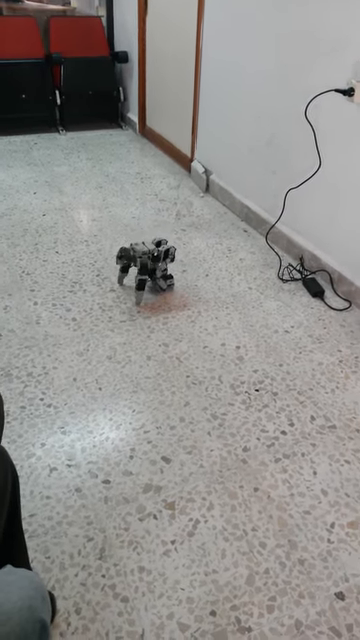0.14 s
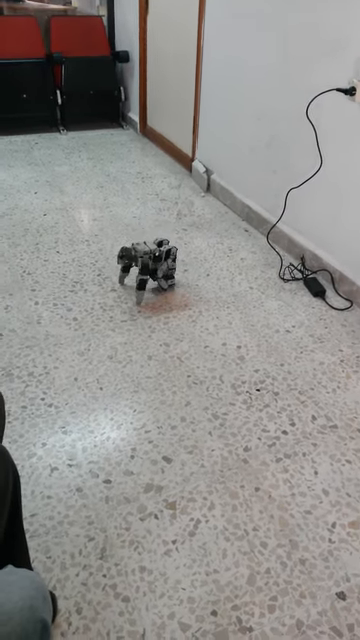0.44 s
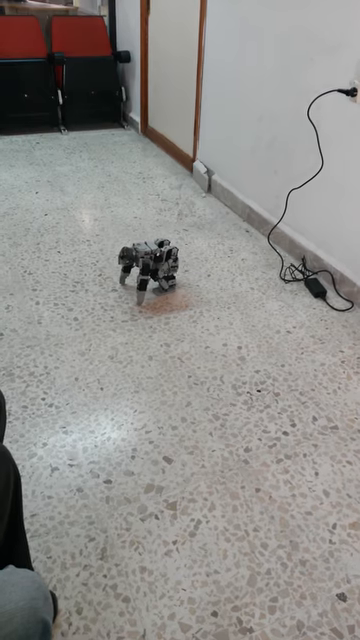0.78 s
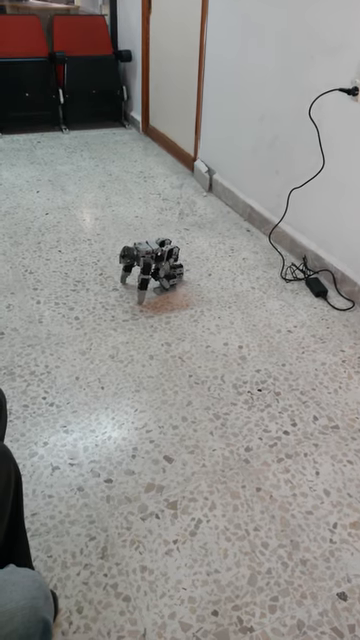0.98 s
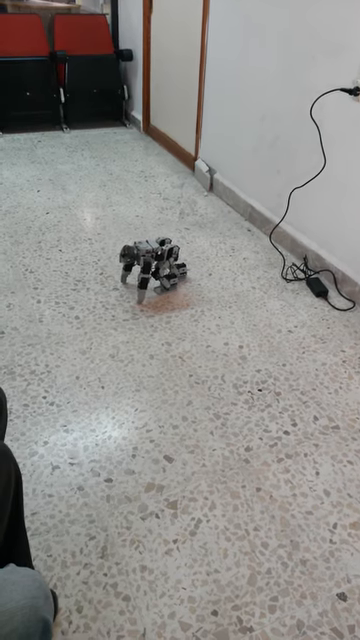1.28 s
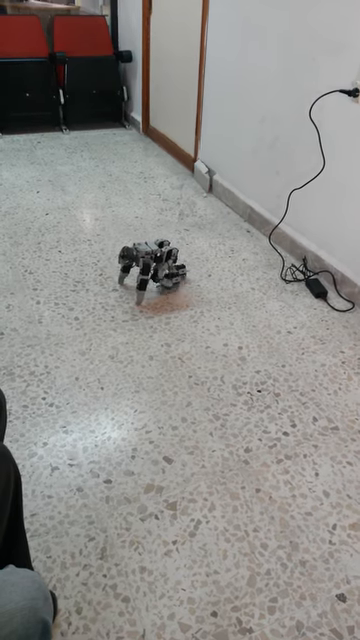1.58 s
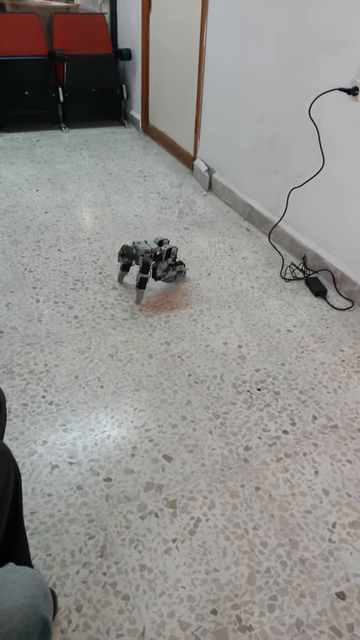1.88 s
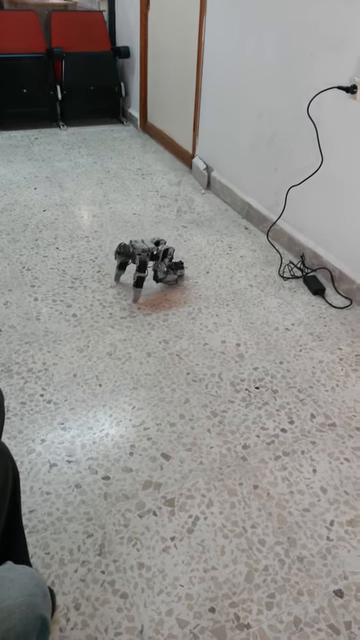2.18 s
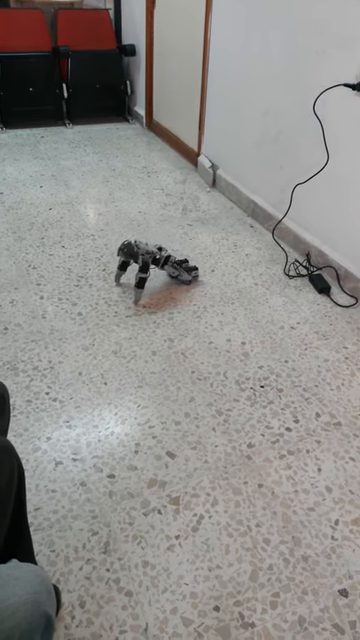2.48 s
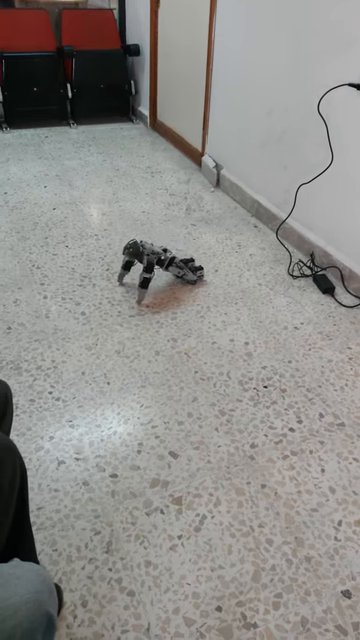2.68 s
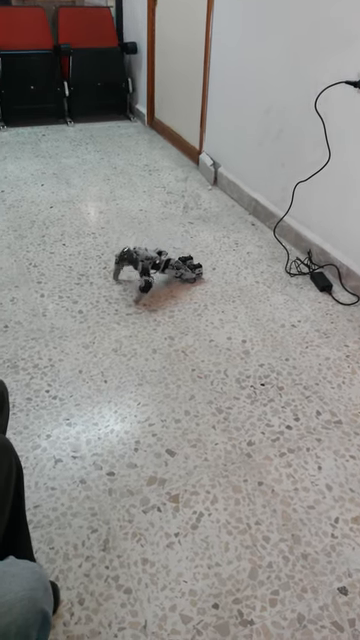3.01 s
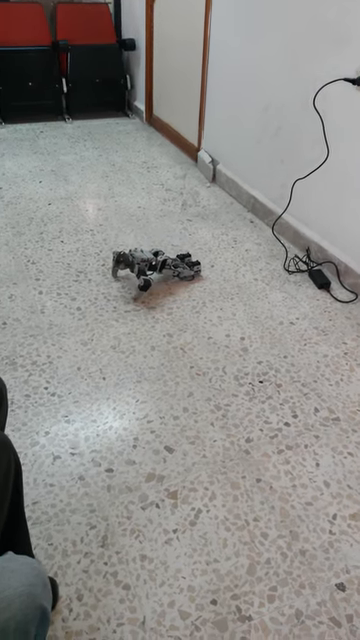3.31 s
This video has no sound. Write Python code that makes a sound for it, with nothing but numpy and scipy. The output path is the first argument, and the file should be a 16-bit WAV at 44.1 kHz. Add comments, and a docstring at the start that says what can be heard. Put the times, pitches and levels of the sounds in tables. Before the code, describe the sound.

Small robot servos whir in a bare, echoing room over soft air noise. A quiet, gritty whine rises and falls at 0.2-0.8 s; a stronger one at 0.85-1.45 has a light tick near 1.1 and faint foot scrape around 1.3. A third, softer, runs 1.5-2.05. The fourth, loudest and highest, runs 2.1-2.75 with clustered hard knocks near 2.4. A final whir spans 2.8-3.4.

```python
"""A small robot lowers itself onto a stone floor in five moves, its servos speeding up and slowing down.
Their gears whine at multiples of the rate at which teeth meet, and rattle as noise pulsed by each tooth.
Limbs knock on the floor, hardest in the fourth move: short noise bursts, ringing tones and a low boom.
A foot scrapes, as shaped noise, as the second move ends. A bare room echoes the robot's sounds.
Soft air noise and faint wavering tones lie underneath."""
import sys
import numpy as np
from scipy import signal
from scipy.fft import rfft, irfft, next_fast_len
from scipy.io import wavfile
from scipy.ndimage import uniform_filter1d

SR = 44100
rng = np.random.default_rng(int(sys.argv[2]) if len(sys.argv) > 2 else 0)


def generate_wav(sig):
    """Save sig (samples, or channels by samples) to the path in sys.argv[1] as 16-bit PCM at SR."""
    pcm = np.round(np.clip(np.atleast_2d(sig).T, -1, 1) * 32767).astype(np.int16)
    wavfile.write(sys.argv[1], SR, pcm)


N = 152145  # length in samples

# Faint tones that come and go. Each row: pitch in Hz, level in dB, loudest moment in seconds,
# time in seconds from there to 1/e of the peak.
HUM = [(124, -58, 4.3, 3.05), (201, -62, 5.1, 5.6), (358, -60, 0.29, 0.28), (334.3, -59, 2.21, 0.96),
       (646, -51, 1.246, 0.2), (634, -59, 2.2, 1.03), (141, -48, 3.116, 0.17)]
# Colour of the air noise. Each row: frequency in Hz, relative level in dB per Hz.
AIR_SPECTRUM = [(30, 5), (70, 18.5), (130, 11), (250, 16), (420, 11), (650, 9), (1000, 5), (1600, 2.5),
                (4000, -7), (7000, -68), (14000, 0)]
# Colour of the foot scraping on stone. Each row: frequency in Hz, relative level in dB per Hz.
SLIDE_SPECTRUM = [(200, -24), (450, -1), (720, 3), (1000, -2), (1400, 4.5), (2200, -4), (4000, -38),
                  (9000, -42)]
# Limbs meeting the floor. Each row: start in seconds, then relative levels in dB of the clack,
# the thud and the boom of the frame.
KNOCKS = [(1.105, -29, -60, -40.5), (1.505, -43, -57, -75), (2.355, -17, -38, -45),
          (2.369, -14.5, -41.5, -37.5), (2.379, -19.5, -54, -66), (2.402, -20, -43.5, -48),
          (2.427, -28, -68, -52), (3.057, -46, -81, -41)]
# Ringing tones of the frame. Each row: pitch in Hz, relative level in dB, time to fall by 60 dB in seconds.
FRAME_TONES = [(1998, -13, 0.14), (3136, 2.5, 0.13), (3184, 3.5, .12), (3330, -15, .05), (3340, 2.5, 0.16),
               (3410, -0.5, 0.13), (3640, -15, 0.075), (4300, -27, .06), (4650, -11, 0.2)]
# Colour of a knock's sharp part. Each row: frequency in Hz, relative level in dB per Hz.
CLACK_SPECTRUM = [(300, -50), (1200, -20.5), (2000, -3), (3200, -2.5), (5000, 0.5), (7400, 8),
                  (10000, -9.5), (14600, -19)]
# Colour of a knock's dull part. Each row: frequency in Hz, relative level in dB per Hz.
THUD_SPECTRUM = [(50, -46), (100, -26), (145, -15), (210, 7), (320, -5), (420, 3), (650, -7.5), (900, -17),
                 (2000, -35)]
# Servo runs. Each row: a list of harmonic levels in dB from the first up, then the course of the run,
# whose rows are: time in seconds, teeth meeting per second in Hz, whine against rattle in dB.
SERVO_RUNS = [([-12, -5, 4, 2.5, -12, -4, -16, -7.5], [(.2, 201.5, -40), (.33, 902, -14), (.385, 1092, -7),
              (.41, 1190, -4), (.45, 1260, 1), (.51, 1220, -4.5), (.557, 1227, -3), (.6, 1057, -21),
              (.8, 196, -40)]), ([3, 2, -6.5, 1.5, -3, -4], [(.82, 200.8, -40), (.98, 1201, -18),
              (1.005, 1275, -4), (1.07, 1404, -0.5), (1.12, 1433, -1), (1.145, 1419, -10), (1.18, 1334, 0),
              (1.22, 1228, -5), (1.26, 1049, -20), (1.46, 196.6, -35)]), ([-16, -8, 3, -16, 0, -8],
              [(.82, 200.4, -47), (1.0, 1316, -5), (1.05, 1500, -3.5), (1.125, 1527, -0.5),
              (1.155, 1552, -6), (1.185, 1614, -7), (1.4, 194.4, -32)]),
              ([2.5, -6.5, 4.5, 2, -0.5, -3.5, -7], [(1.48, 199.8, -37), (1.64, 1218, -10),
              (1.665, 1313, -2), (1.7, 1412, -1.5), (1.745, 1440, -2), (1.785, 1396, 3), (1.83, 1280, -1),
              (1.86, 1179, -3), (1.89, 1058, -18), (2.07, 200, -35)]), ([-10, 3, -0.5, -21],
              [(2.1, 400.7, -38), (2.24, 1955, -21), (2.27, 2160, -2.5), (2.305, 2340, -2.5),
              (2.35, 2470, 0), (2.42, 2718, -4), (2.5, 2706, -5), (2.528, 2540, -2), (2.55, 2109, 4),
              (2.562, 2030, -17), (2.585, 2078, 0), (2.61, 1938, -7), (2.77, 400.3, -40)]),
              ([-3.5, 0, 7.5, -4, -1.5, -2], [(2.78, 298.9, -37), (2.91, 1563, -14), (2.96, 1935, -6),
              (3.01, 2072, 0), (3.06, 2082, -1.5), (3.11, 2063, 0.5), (3.15, 1908, -8), (3.42, 292, -57)]),
              ([-1, -5, -9, -2, 4.5, -4], [(2.78, 200.1, -38), (2.95, 1400, -14), (3.03, 1479, -9),
              (3.11, 1447, -3.5), (3.2, 1194, -7), (3.42, 201.5, -40)])]
# Effort of all gear trains together. Each row: time in seconds, level in dB.
EFFORT = [(0.0, -46.5), (0.2, -60), (0.32, -42.5), (0.45, -37), (0.61, -35.5), (0.81, -64.5), (0.87, -43.5),
          (0.95, -29.5), (1.05, -27.5), (1.15, -27.5), (1.29, -28), (1.48, -55), (1.53, -41.5), (1.68, -33),
          (1.78, -33.5), (1.95, -35), (2.08, -63), (2.2, -30), (2.32, -24), (2.36, -23), (2.378, -20),
          (2.52, -24.5), (2.55, -21.5), (2.68, -39), (2.78, -46), (2.88, -32), (2.96, -25.5), (3.13, -27),
          (3.19, -25), (3.42, -53.5), (3.45, -41)]
# How strongly whine comes through at each pitch. Each row: frequency in Hz, gain in dB.
WHINE_RESPONSE = [(1200, -36), (2000, -8.5), (2800, -7.5), (3600, -4.5), (4400, -0.5), (5400, -0.5),
                  (6200, -2), (7200, 3.5), (8300, 1.5), (10400, -1.5), (13000, -13)]
# Colour of the gear rattle. Each row: frequency in Hz, relative level in dB per Hz.
RATTLE_SPECTRUM = [(300, -95), (1200, -63), (1900, -22.5), (2600, -9.5), (3400, -7.5), (4400, 0.5),
                   (5600, 1.5), (6600, 2), (7400, 3.5), (8300, -2), (9200, -3), (10300, -5.5),
                   (12000, -8.5), (14600, -17)]
# Difference between the microphone's two openings. Each row: frequency in Hz, left minus right in dB.
PORT_BALANCE = [(100, 0), (700, 0), (1300, 2.5), (2400, 1), (3200, 2.5), (4300, 6), (5800, 1.5),
                (7600, -10.5), (8600, -5.5), (10300, -1), (14000, 4)]

SIDES = np.array([[1], [-1]])  # left, right

# Background: level of the air noise, its left-right part as a share, spread of the hum levels
AIR_DB, AIR_SIDE, HUM_FLUTTER_DB = -57.5, 0.65, 1.5
# Scrape: loudest moment, time from there to 1/e, level, spread of its unevenness
SLIDE_S, SLIDE_HALF_S, SLIDE_DB, SLIDE_FLUTTER_DB = 1.33, .14, -57, 3
# Room: T60 is the time to fall by 60 dB; the early echoes fall to 1/e in EARLY_DECAY_S
ROOM_T60_S, ROOM_LOW_T60_S, EARLY_DECAY_S = .3, 0.97, .015
DIRECT_DB, TAIL_DB, EARLY_DB = -3.5, 0, -9
# How much room each sound gets
SLIDE_ROOM_DB, KNOCK_ROOM_DB, THUD_ROOM_DB, WHINE_ROOM_DB, RATTLE_ROOM_DB = 3.0, -1.5, -5, -4, 1
# Knocks
CLACK_T60_S, THUD_T60_S, BOOM_T60_S = 0.038, 0.15, 0.17
RING_DB, THUD_DB = -4.5, 3.5  # THUD_DB lifts thud and boom together
# The frame shaking on its legs
BODY_HZ, BODY_WIDTH_HZ, BODY_DB = 161, 43, -37
# Whine: speed changes are spreads, as shares of the speed
SPEED_WOBBLE, TOOTH_JITTER = .006, .019
WHINE_DB, WHINE_FLUTTER_DB = 2, 3
# Tooth impacts: fall to 1/e as a share of a tooth period, spread of their sizes, smooth friction level
TOOTH_DECAY, TOOTH_SCATTER_DB, SLIDING_DB = 0.3, 1.5, -8.5
RATTLE_DB, RATTLE_FLUTTER_DB = -3, 2.05
# Rattle treble above BRIGHT_HZ: range from no load to full load, change while effort falls,
# and the effort that counts as half load
BRIGHT_HZ, LOAD_DB, COAST_DB, LOAD_KNEE_DB = 7600, 8.5, -6, -29
FULL_DB, LEAD_S = -20, 0.014  # upper limit of the effort; how far ahead its course is read
# Microphone: delay of the left side behind the right, top of the range
PORT_LAG_S, TOP_HZ = .000022, 14650


def undb(db):
    """Turn decibels into a gain."""
    return 10 ** (np.asarray(db) / 20)


def unit(x):
    """Scale to an average strength (rms) of 1."""
    return x / np.sqrt(np.mean(x ** 2))


def at_hz(hz, points):
    """Read a table of levels between its points, on a log-frequency axis."""
    f, db = np.array(points, float).T
    return np.interp(np.log(np.maximum(hz, 1)), np.log(f), db)


def shape(x, gain):
    """Filter by a gain that depends on frequency."""
    size = next_fast_len(2 * N)
    f = np.arange(size // 2 + 1) * SR / size
    return irfft(rfft(x, size) * gain(f), size)[..., :N]


def noise(points):
    """Random noise with a given colour, at rms 1."""
    return colour(rng.standard_normal(N), points)


def colour(x, points):
    """Filter x by a table of levels and bring it to rms 1."""
    return unit(shape(x, lambda f: undb(at_hz(f, points))))


def walk(rate):
    """Smooth random drift, mostly slower than rate times a second, at rms 1."""
    return unit(shape(rng.standard_normal(N), lambda f: 1 / (1 + (f / rate) ** 4)))


def fade(t, t60):
    """Start at t = 0 and die away by 60 dB in t60 seconds."""
    return (t >= 0) * np.exp(-np.log(1000) * np.maximum(t, 0) / t60)


def background(t):
    """Air noise spread over both sides, and tones that waver in pitch and level."""
    air = noise(AIR_SPECTRUM) + AIR_SIDE * SIDES * noise(AIR_SPECTRUM)
    hum = np.zeros(N)
    for hz, db, top_s, half_s in HUM:
        level = undb(db + HUM_FLUTTER_DB * walk(12.0))
        swell = np.exp(-((t - top_s) / half_s) ** 2)
        phase = np.cumsum(hz * (1 + 0.03005 * walk(44.7))) / SR
        hum += level * swell * np.sin(2 * np.pi * phase)
    return undb(AIR_DB) * air + hum


def room(x, t, room_db):
    """Direct sound plus fading noise echoes: a short early part and a tail that lasts longer in the bass."""
    early = rng.standard_normal((2, N)) * np.exp(-t / EARLY_DECAY_S)
    late = rng.standard_normal((2, N))
    low = shape(late, lambda f: 1 / (1 + (f / 1500) ** 4))
    tail = low * fade(t, ROOM_LOW_T60_S) + (late - low) * fade(t, ROOM_T60_S)
    echo = (undb(EARLY_DB) * unit(early) + undb(TAIL_DB) * unit(tail)) / np.sqrt(N)
    # deep echoes are nearly alike on both sides
    mid = echo.mean(axis=0)
    echo = mid + shape(echo - mid, lambda f: f / np.hypot(f, 350))
    echoes = signal.fftconvolve(x[None], echo, axes=1)[:, :N]
    return undb(DIRECT_DB) * x + undb(room_db) * echoes


def slide(t):
    """A foot rubs over stone: a brief, uneven scrape of noise."""
    level = undb(SLIDE_DB + SLIDE_FLUTTER_DB * walk(24))
    swell = np.exp(-((t - SLIDE_S) / SLIDE_HALF_S) ** 2)
    return noise(SLIDE_SPECTRUM) * level * swell


def body():
    """The frame shaking on its legs: noise around one low resonance, at rms 1."""
    return unit(shape(rng.standard_normal(N), lambda f: 1 / (1 + ((f - BODY_HZ) / BODY_WIDTH_HZ) ** 4)))


def frame_ring(age):
    """A blow sets the frame ringing: many tones, each dying away at its own pace."""
    ring = np.zeros(N)
    for hz, db, t60 in FRAME_TONES:
        ring += undb(db) * fade(age, t60) * np.sin(2 * np.pi * (hz * age + rng.random()))
    return ring / 2


def knocks(t):
    """Each contact clacks in the housings, rings the frame, thuds on the floor and leaves a low boom."""
    clack, thud, boom = noise(CLACK_SPECTRUM), noise(THUD_SPECTRUM), body()
    sharp, low = np.zeros(N), np.zeros(N)
    for start, clack_db, thud_db, boom_db in KNOCKS:
        age = t - start
        sharp += undb(clack_db) * (clack * fade(age, CLACK_T60_S) + undb(RING_DB) * frame_ring(age))
        low += undb(thud_db) * thud * fade(age, THUD_T60_S)
        # the boom swells while the clack dies away
        low += undb(boom_db) * boom * (fade(age, BOOM_T60_S) - fade(age, CLACK_T60_S))
    return room(sharp, t, KNOCK_ROOM_DB) + room(undb(THUD_DB) * low, t, THUD_ROOM_DB)


def whine(t):
    """Gear teeth mesh faster, then slower; gives their harmonic whine and the power of their impacts."""
    tone, teeth = np.zeros(N), np.zeros(N)
    for harmonics_db, course in SERVO_RUNS:
        times, rates, levels_db = np.array(course).T
        rate = np.interp(t, times, rates, left=0, right=0)
        hz = rate * (1 + SPEED_WOBBLE * walk(45) + TOOTH_JITTER * walk(700))
        phase = np.cumsum(hz) / SR  # counts the teeth
        lines = np.zeros(N)
        for k, own_db in enumerate(harmonics_db, 1):
            line_db = own_db + at_hz(k * hz, WHINE_RESPONSE) + WHINE_FLUTTER_DB * walk(74)
            lines += undb(line_db) * np.sin(2 * np.pi * k * phase)
        tone += (rate > 0) * undb(np.interp(t, times, levels_db)) * lines / 2
        # every tooth hits with its own strength
        strength = undb(TOOTH_SCATTER_DB * rng.standard_normal(N))[phase.astype(int)]
        impacts = rate / rates.max() * strength * np.exp(-(phase % 1) / TOOTH_DECAY)
        teeth += impacts ** 2
    # even out the slow changes; the effort sets the loudness
    return tone, teeth / (uniform_filter1d(teeth, SR // 16) + 1e-3)


def rattle(teeth, effort_db):
    """Tooth impacts and friction shake one housing: brighter under load, duller while effort falls."""
    x = np.sqrt(teeth + undb(2 * SLIDING_DB)) * rng.standard_normal(N)
    x /= np.sqrt(uniform_filter1d(x ** 2, SR // 16))
    x = colour(x, RATTLE_SPECTRUM) * undb(RATTLE_DB + RATTLE_FLUTTER_DB * walk(32))
    load = 1 / (1 + undb(2 * (LOAD_KNEE_DB - effort_db)))
    # 1 where effort falls by 80 dB a second or faster, then smoothed
    falling = np.clip(-np.gradient(effort_db) * SR / 80, 0, 1)
    coasting = uniform_filter1d(falling, SR // 12)
    treble = shape(x, lambda f: 1 - 1 / (1 + (f / BRIGHT_HZ) ** 8))
    treble_gain = undb(LOAD_DB * (load - .5) + COAST_DB * coasting)
    return x + treble * (treble_gain - 1)


def servos(t, count=3):
    """Whine, rattle and shaking follow the effort; each housing's rattle has its own room echoes."""
    tone, teeth = whine(t)
    effort_db = np.minimum(np.interp(t + LEAD_S, *np.array(EFFORT).T), FULL_DB)
    drive = undb(effort_db)
    housings = sum(room(drive * rattle(teeth, effort_db), t, RATTLE_ROOM_DB) for _ in range(count))
    gears = drive * (undb(WHINE_DB) * tone + undb(BODY_DB) * body())
    return housings / np.sqrt(count) + room(gears, t, WHINE_ROOM_DB)


def scene():
    """The robot in its room, over the background."""
    t = np.arange(N) / SR
    return background(t) + room(slide(t), t, SLIDE_ROOM_DB) + knocks(t) + servos(t)


def record(dry):
    """Two microphone openings, the left a little later and differently coloured; the top is cut steeply."""
    def port_gain(f):
        balance = undb(SIDES * at_hz(f, PORT_BALANCE) / 2)
        delay = np.exp(-1j * np.pi * f * SIDES * PORT_LAG_S)  # half the lag on each side
        return balance * delay

    top_cut = signal.ellip(10, .2, 80, TOP_HZ, fs=SR, output="sos")
    return signal.sosfilt(top_cut, shape(dry, port_gain))


dry = scene()
out = record(dry)
generate_wav(out)
```